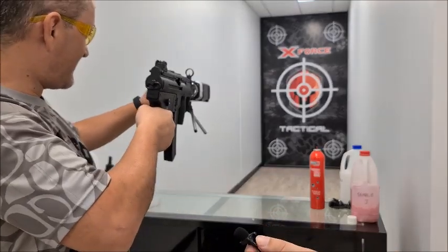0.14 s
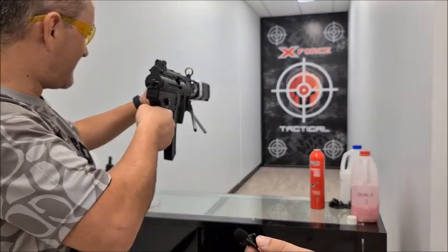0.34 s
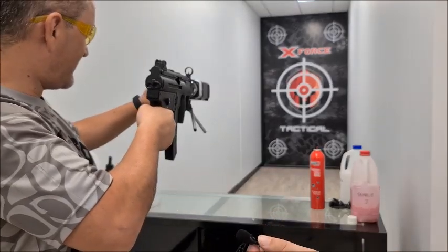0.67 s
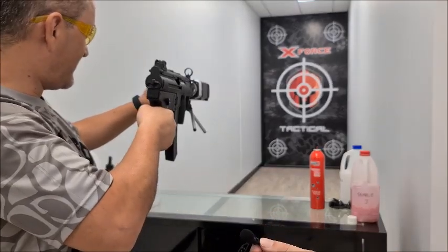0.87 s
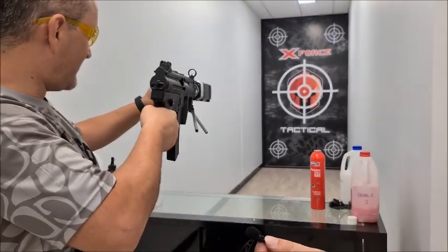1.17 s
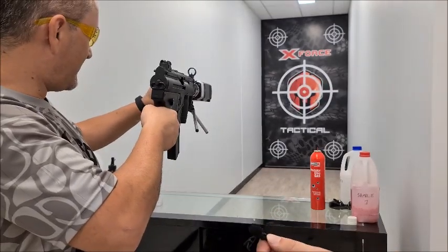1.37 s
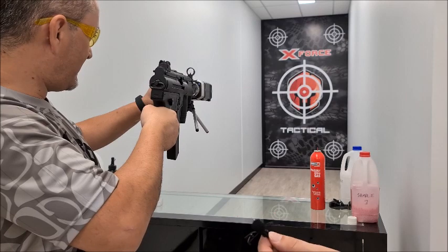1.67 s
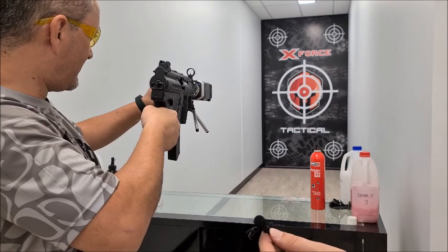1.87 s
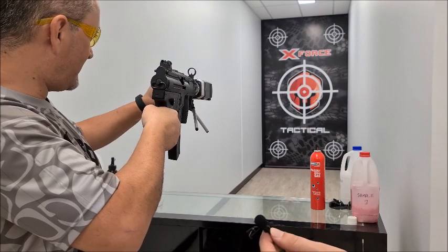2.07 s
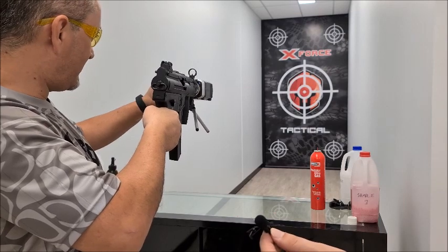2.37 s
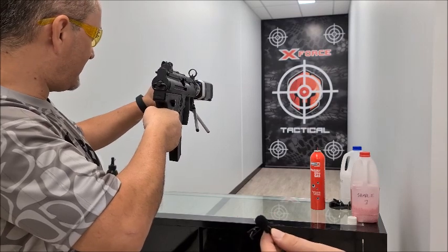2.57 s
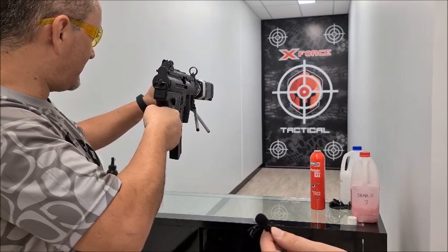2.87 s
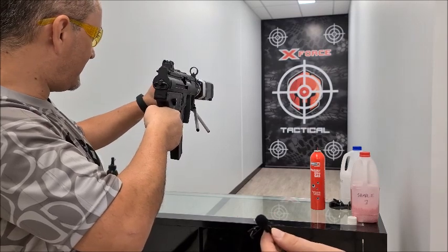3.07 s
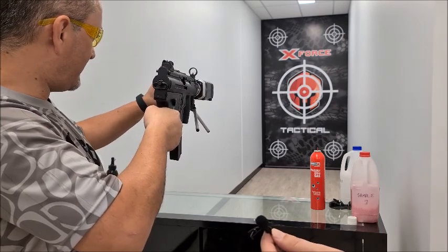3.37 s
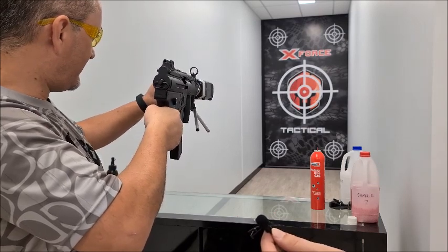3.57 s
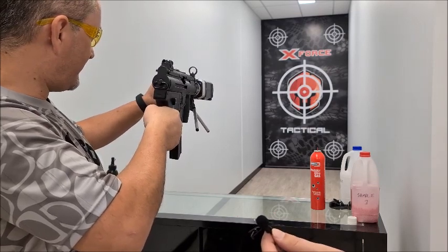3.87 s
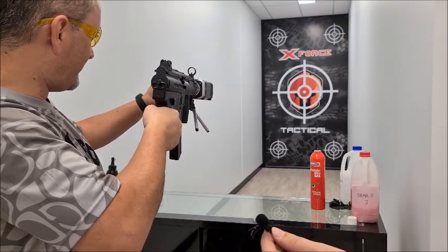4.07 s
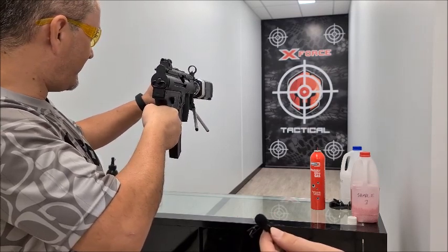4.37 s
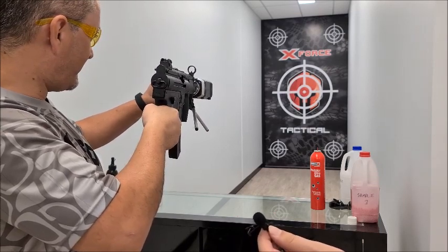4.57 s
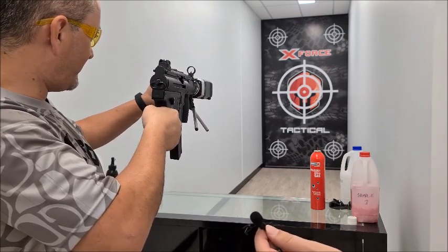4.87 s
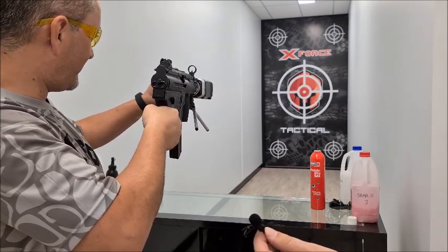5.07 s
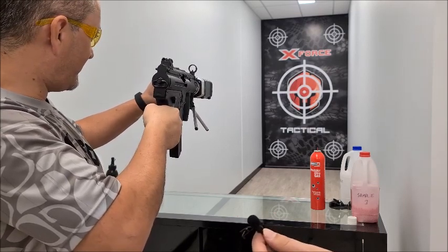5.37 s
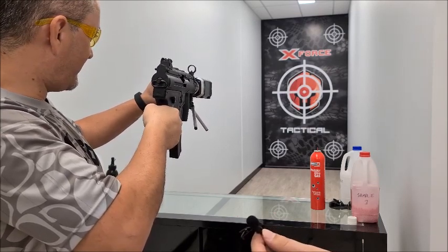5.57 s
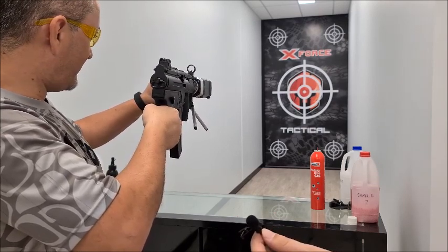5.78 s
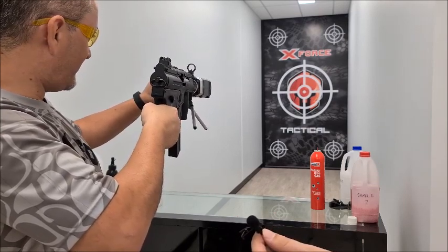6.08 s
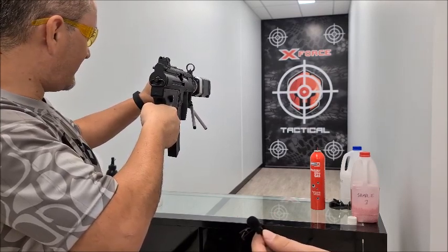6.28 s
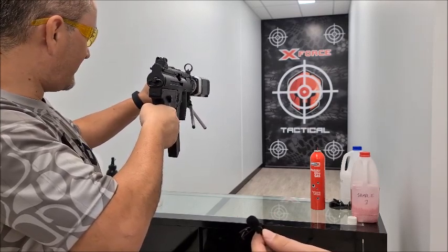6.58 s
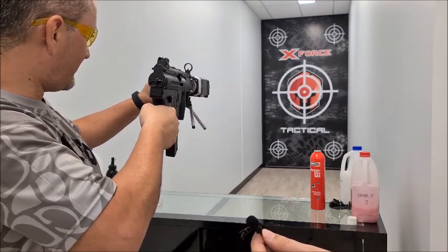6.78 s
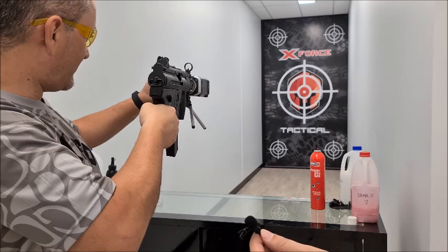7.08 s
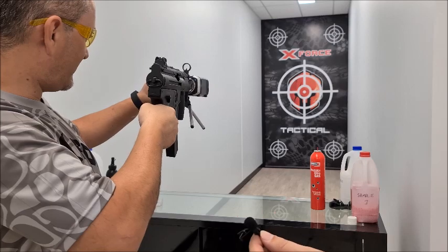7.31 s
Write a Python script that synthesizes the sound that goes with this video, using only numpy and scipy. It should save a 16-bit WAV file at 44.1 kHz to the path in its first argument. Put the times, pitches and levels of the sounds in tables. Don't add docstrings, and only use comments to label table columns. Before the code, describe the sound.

Close mono pickup in a hard-walled narrow room with faint hiss and hum. A trigger click and scratchy microphone handling come first, then nine loud single blaster shots at a fairly steady pace. Every shot packs hammer tap, airy blast, bolt slam and return into a rapid clatter, followed by a dull banner thud, fading gas hiss and crisp pellet ticks. Light trigger clicks precede shots; the radio link briefly warbles.

```python
import sys
import numpy as np
from scipy import signal
from scipy.fft import rfft, irfft, next_fast_len
from scipy.io import wavfile
from scipy.ndimage import uniform_filter1d, minimum_filter1d, map_coordinates

SR = 44100
rng = np.random.default_rng(int(sys.argv[2]) if len(sys.argv) > 2 else 0)


def volts_from_db(level):
    exponent = np.asarray(level, float) / 20
    return 10 ** exponent


def materialize(psi):
    bounded = np.clip(np.atleast_2d(psi).T, -1, 1)
    quanta = np.round(bounded * 32767).astype(np.int16)
    wavfile.write(sys.argv[1], SR, quanta)


N = 328320

# valve_opens_s, valve_db, slam_db, return_db, gas_charge_db
SHOTS = [
    (0.4026, 2.5, 2.5, -0.3, 6),
    (1.3335, 3, 4, 1, -1.2),
    (2.0552, 2.9, -0.5, 5.5, 5),
    (2.8416, -1.3, 1.55, 1.2, 6.5),
    (3.6011, 2.6, 2.4, 0.2, 6.5),
    (4.3697, 3.1, 1.5, 1.5, 6.5),
    (5.3659, -2, 2.5, 3.5, 4.5),
    (6.1583, 3, 0.5, 4, 3.5),
    (7.0381, 4.2, 3, -2, 2),
]


def along(points, hz):
    point_hz, values = np.transpose(points)
    return np.interp(np.log(hz + 1), np.log(point_hz + 1), values)


def filtered(x, response):
    size = next_fast_len(N + SR)
    hz = np.fft.rfftfreq(size, 1 / SR)
    return irfft(rfft(x, size) * response(hz), size)[:N]


def noise(spectrum):
    x = filtered(rng.standard_normal(N), lambda hz: volts_from_db(along(spectrum, hz)))
    return x / np.std(x)


def resonant(x, modes):
    def response(hz):
        total = 0
        for k, (centre_hz, width_hz, db) in enumerate(modes):
            damping = 1j * hz * width_hz
            total = total + (-1) ** k * volts_from_db(db) * damping / (centre_hz ** 2 - hz ** 2 + damping)
        return total
    return filtered(x, response)


def add(line, start_s, db, t60, rise):
    start = round(start_s * SR)
    t = np.arange(min(round(1.5 * t60 * SR) + 2, N - start)) / SR
    decay = volts_from_db(db - 60 * t / t60)
    line[start:][:len(t)] += decay * (1 - np.exp(-(t + 1 / SR) / rise))


def wander(step):
    return map_coordinates(rng.standard_normal(N // step + 4), [np.arange(N) / step])


def background():
    # hz, level_db
    air = [(25, -14.5), (60, 1.4), (150, -0.5), (400, -9.5), (3000, -11.5), (6000, -21.5), (9000, -22.5),
           (16000, -30)]
    # hz, rms_db
    hum = [(700, -78), (790, -78), (1000, -80), (1095, -80), (1495, -81), (2870, -83)]
    t = np.arange(N) / SR
    whistle = resonant(rng.standard_normal(N), [(5860, 380, 0)])
    lines = sum(volts_from_db(db) * np.sqrt(2) * np.sin(2 * np.pi * hz * t) for hz, db in hum)
    return volts_from_db(-66.5) * noise(air) + volts_from_db(-73.0) * whistle / np.std(whistle) + lines


def strokes(column):
    # full_pressure_s, press_in_s, hold_s, rumble_db, casing_db
    rub = [
        (0.192, 0.047, 0.028, -46.5, -56),
        (0.231, .012, .046, -47, -51),
        (0.305, .004, 0.0058, -48, -53.5),
    ]
    lift_s, fade_db = 0.038, 30
    t, gain = np.arange(N) / SR, np.zeros(N)
    for row in rub:
        full_s, press_s, hold_s = row[:3]
        corners_s = np.cumsum([full_s - press_s, press_s, hold_s, lift_s])
        gain += volts_from_db(row[column] + np.interp(t, corners_s, [-fade_db, 0, 0, -fade_db], -120, -120))
    return gain


def finger():
    # hz, width_hz, level_db
    casing = [(3140, 45, 3), (5870, 250, -19), (6760, 250, -18), (7500, 180, -22), (12750, 180, -16)]
    # start_s, peak_db, low_push_db
    slip_events = [
        (0.212, -28, -10),
        (.228, -46, -17),
        (0.312, -33, -8),
    ]
    rumble_spectrum = [(30, -15.0), (100, 4.5), (500, -2.5), (1100, -16.0), (2500, -24.0), (5000, -40.0)]
    jolt_spectrum = [(100, 4.5), (1000, -1.0), (4000, -14), (10000, -22), (15000, -28)]
    grains = volts_from_db(2.5 * wander(150))
    ring = resonant(grains * rng.standard_normal(N), casing)
    rumble = grains * noise(rumble_spectrum)
    jolts, pushes = np.zeros((2, N))
    for start_s, db, push_db in slip_events:
        add(jolts, start_s, db - 5.0, t60=0.0046, rise=0.00022)
        add(pushes, start_s, db + push_db + 19, t60=0.024, rise=0.00089)
    slips = jolts * noise(jolt_spectrum) + resonant(pushes, [(61.3, 45, -7), (550, 300, -10)])
    rubbing = strokes(column=4) * ring / np.std(ring) + strokes(column=3) * rumble / np.std(rumble)
    return rubbing + slips


def trigger():
    # start_s, click_db, hollow_knock_db
    taps = [(.027, -42, -46), (1.1191, -38.5, -42.5), (1.9134, -36, -42.5), (2.6971, -39, -41),
            (3.4823, -39, -41), (4.2675, -37.5, -40.5), (4.291, -53.5, -42.5), (5.2295, -50.5, -42),
            (5.3, -54, -44), (6.047, -34, -38), (6.9421, -35.5, -42), (6.9628, -46, -38)]
    # hz, width_hz, level_db
    sear = [(1000, 150, -11.5), (1510, 280, -7), (1860, 220, -4.1), (2620, 1000, -5.5), (3500, 990, -6.5),
            (4400, 250, -2), (7000, 1200, -21)]
    bounces = [(.001, -3), (.006, -8), (.011, -9.5), (.019, -11)]  # delay_s, level_db
    clicks, knocks = np.zeros((2, N))
    for start_s, click_db, knock_db in taps:
        add(clicks, start_s, click_db + 21.5, t60=0.00069, rise=.00005)
        for delay_s, bounce_db in bounces:
            at_s = start_s + delay_s * rng.uniform(.75, 1.25)
            add(knocks, at_s, knock_db + bounce_db + rng.normal(18.5, 1.5), t60=.0015, rise=0.00022)
    rattle = clicks * (1.1 + 0.25 * rng.standard_normal(N))
    hollow = resonant(resonant(knocks, [(650, 130, 0.013)]), [(660, 460, 2.5)])
    return resonant(rattle, sear) + hollow


def bits():
    # start_s, peak_db, gap_to_twin_s
    late_pairs = [
        (0.565, -10, .02),
        (1.531, -14, .004),
        (2.245, -17.5, 0.0036),
        (3.035, -12.5, .006),
        (3.804, -12.5, .003),
        (4.572, -16.5, .004),
        (5.5589, -12, .003),
        (6.366, -11, .004),
        (7.2561, -11, 0.0046),
    ]
    # hz, level_db
    splat = [(3000, -32.5), (6000, 4), (8000, 0), (11500, 5), (15500, -7)]
    early_s, early_scatter_s, early_db = .16, .003, -16.5
    twin_drop_db = 5.5
    events = [(shot[0] + early_s + rng.normal(0, early_scatter_s), early_db) for shot in SHOTS]
    for start_s, db, gap_s in late_pairs:
        events += [(start_s, db), (start_s + gap_s, db - twin_drop_db)]
    ticks = np.zeros(N)
    for start_s, db in events:
        add(ticks, start_s, db - 1.5, t60=0.013, rise=0.000067)
    return ticks * noise(splat)


def banner():
    # delay_after_valve_s, hz, peak_db, t60_s, rise_s
    sheet_modes = [(0.022, 127, -17.5, 0.36, 0.027), (.057, 270, -5.5, 0.09, 0.006),
                   (.066, 445, -5, 0.11, 0.0077), (.084, 320, -16, 0.12, 0.0069),
                   (.09, 430, -7.5, 0.077, 0.0078), (.07, 180, -21.5, .25, 0.0088),
                   (0.065, 770, -21.5, 0.2, 0.0058)]
    pellet_db, growth = -5, 0.56
    boom, t = np.zeros(N), np.arange(N) / SR
    for delay_s, hz, mode_db, t60, rise in sheet_modes:
        swell = np.zeros(N)
        for valve_s, *_, gas_db in SHOTS:
            at_s = valve_s + delay_s + rng.normal(0, 0.0011)
            blow_db = pellet_db + growth * gas_db + mode_db + rng.normal(0, 2.2)
            add(swell, at_s, blow_db, t60, rise)
        boom += swell * np.sin(2 * np.pi * hz * t + 0.7 * wander(900))
    return boom


def blaster():
    # time_s, cycle_length (1 = nominal)
    pace_curve = [(.4, 1), (1.33, .97), (2.05, .99), (5.4, 1.005), (7.04, 1.03)]
    contacts_s = [
        [-.0093, -.007, 0, .0023],
        [.0096, .0126, .0177, .0212, .027],
        [.0356, .043, .0565, .063],
    ]
    # puff_db, puff_t60_s, barrel_knock_db, grip_knock_db
    valve = [
        (-37, 0.019, -35, -35.5),
        (-29.5, 0.026, -35.5, -28.5),
        (-14.5, 0.055, -24.5, -24.5),
        (-6, 0.023, -21, -17),
    ]
    slam = [
        (-6.5, 0.05, -17.5, -18),
        (-9, 0.026, -11, -0.5),
        (-10, 0.069, 5.5, -3),
        (-9, 0.018, 0, -15),
        (-9.5, 0.033, -12.5, -15.5),
    ]
    bolt_return = [
        (-9.5, 0.027, -11, -14),
        (-7, 0.014, -13, -12),
        (-6, 0.037, -16.5, -20),
        (-8, .04, -1, -20.5),
    ]
    # hz, level_db
    puff_spectrum = [(200, -35), (500, -12.5), (1200, -5), (2000, 0), (4000, -4.5), (10500, -2),
                     (13000, -5), (16000, -21.5)]
    leak_spectrum = [(300, -30.5), (1200, -7), (2500, -2.5), (7000, -1), (10500, -3.5), (13000, -8.5),
                     (16000, -26.5)]
    blast_spectrum = [(300, -40.5), (1200, -18), (2200, -8), (4500, -0.5), (7000, -3), (10000, -2),
                      (13000, -3), (16000, -23)]
    # hz, width_hz, level_db
    barrel_modes = [(136, 45, -6.5), (310, 210, -11.5), (468, 120, -7.5), (1067, 62, 1.5),
                    (1254, 160, -6.5), (1880, 350, -4.5), (3070, 940, -8.5)]
    grip_modes = [(682, 110, 1), (1610, 110, -5)]

    blast, puffs, leak, barrel, grip = np.zeros((5, N))
    phases = list(zip((blast, puffs, puffs), contacts_s, (valve, slam, bolt_return)))
    for valve_s, *phase_db, gas_db in SHOTS:
        pace = np.interp(valve_s, *np.transpose(pace_curve))
        for (gas, delays_s, contacts), db in zip(phases, phase_db):
            for delay_s, (puff_db, t60, barrel_db, grip_db) in zip(delays_s, contacts):
                at_s = valve_s + pace * delay_s
                scatter_db = rng.normal(0, 1.0, 3)
                add(gas, at_s, db + puff_db + scatter_db[0], t60, rise=0.00031)
                add(barrel, at_s, db + barrel_db + scatter_db[1] + 21, t60=0.00085, rise=.00005)
                add(grip, at_s, db + grip_db + scatter_db[2] + 20, t60=0.00086, rise=.00005)
        add(leak, valve_s + 0.042, gas_db - 11.5, t60=0.35, rise=0.032)
    hiss = blast * noise(blast_spectrum) + puffs * noise(puff_spectrum) + leak * noise(leak_spectrum)
    return hiss + resonant(barrel, barrel_modes) + resonant(grip, grip_modes)


def room(x):
    # hz, t60_s
    decay = [(100, .5), (450, 0.67), (1500, 0.57), (5000, 0.62), (8000, 0.49), (11500, 0.45), (16000, 0.34)]
    # hz, level_db
    walls = [(100, -9), (500, 0.86), (2000, -5), (7000, 0), (12000, -0.5), (16000, 6.5)]
    # hz, width_hz, level_db
    standing = [(121.6, 4, 0), (276, 33, -4), (306, 20, -4.5), (442.6, 40, -0.5), (820, 11, -6),
                (1093.4, 47, 4.5), (7060, 470, -5.5)]
    hz, t, z = signal.stft(rng.standard_normal(SR), SR, nperseg=256)
    fall_db = along(walls, hz)[:, None] - 60 * t / along(decay, hz)[:, None]
    build_up = 1 - np.exp(-t / 0.0045)
    tail = signal.istft(z * volts_from_db(fall_db) * build_up, SR, nperseg=256)[1]
    tail = tail + resonant(np.pad(tail, (0, N - len(tail))), standing)[:len(tail)]
    delayed = np.pad(x, (260, 0))
    return signal.fftconvolve(delayed, tail / np.linalg.norm(tail))[:N]


def scene():
    small = bits() + trigger()
    far, shots = banner(), blaster()
    echo = room(volts_from_db(-3.5) * shots + volts_from_db(-1.5) * far + volts_from_db(-7.5) * small)
    return (background() + finger() + small + far + shots + echo)[None]


def starve(x, size=1536, count=18):
    # centre_s, line_level_db, depth (0-1)
    frames = [
        (1.636, -2, 0.5),
        (2.125, -1, 0.8),
        (2.34, -1, 0.55),
        (3.129, 0.5, 0.8),
        (3.684, -1, .95),
        (4.559, -2, 0.5),
        (5.412, -1, 1),
    ]
    y, window = x.copy(), np.hanning(size)
    edges = np.unique((np.linspace(2.8, 20.5, count) ** 2).astype(int))
    for centre_s, db, depth in frames:
        at = round(centre_s * SR) - size // 2
        frame = x[at:at + size]
        z = rfft(frame * np.sqrt(window))
        kept = np.zeros_like(z)
        for lo, hi in zip(edges, edges[1:]):
            top = lo + np.argmax(abs(z[lo:hi]))
            phase = z[top] / abs(z[top])
            kept[top] = phase * np.linalg.norm(z[lo:hi]) * np.sqrt(2)
        y[at:at + size] += depth * window ** 1.2 * (volts_from_db(db) * irfft(kept) - frame)
    return y


def band_limit(x):
    return signal.sosfilt(signal.butter(12, 16460, fs=SR, output="sos"), x)


def record(dry):
    x = dry[0]
    need = np.minimum(1, 1.15 / (np.abs(x) + 1e-9))
    x = x * uniform_filter1d(minimum_filter1d(need, size=441), size=221)
    x = x / (1 + np.abs(x) ** 8) ** (1 / 8)
    x = filtered(starve(x), lambda hz: volts_from_db(-26 * np.clip((hz - 15750) / 200, 0, 1) - 40 * (hz > 16460)))
    return band_limit(x[None])


dry = scene()
out = record(dry)
materialize(out)
```